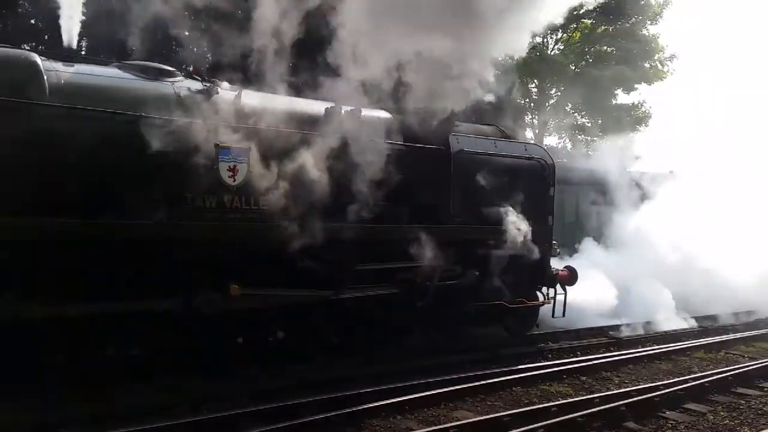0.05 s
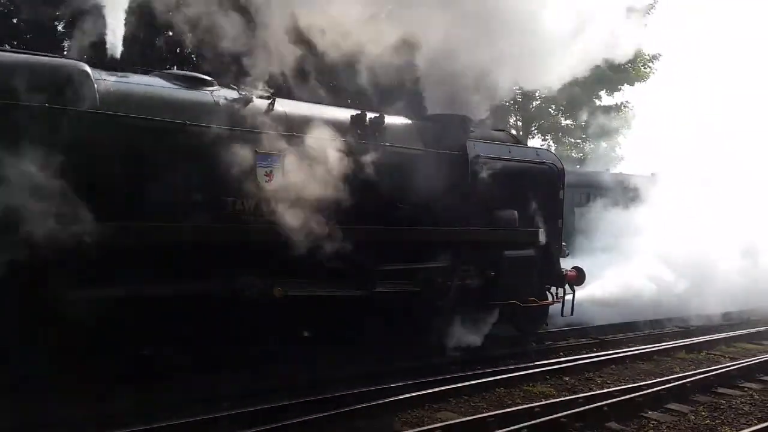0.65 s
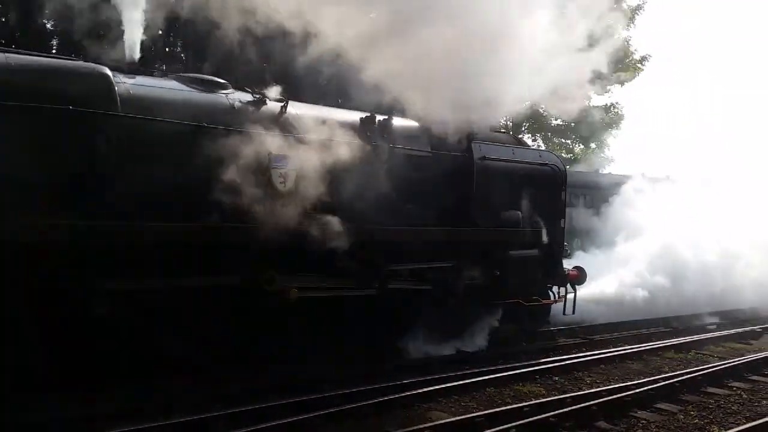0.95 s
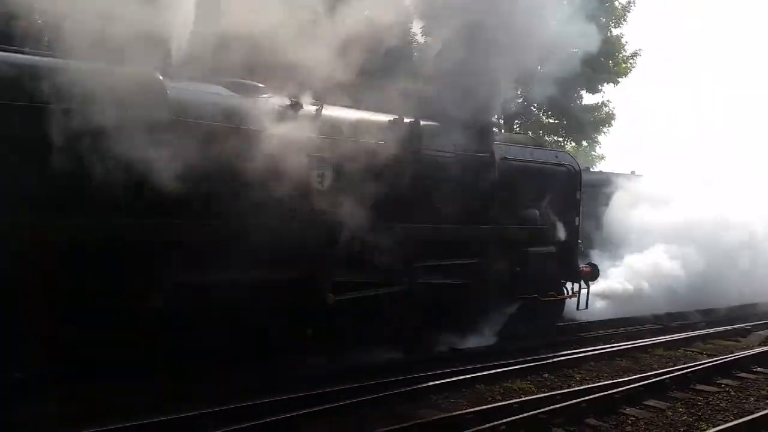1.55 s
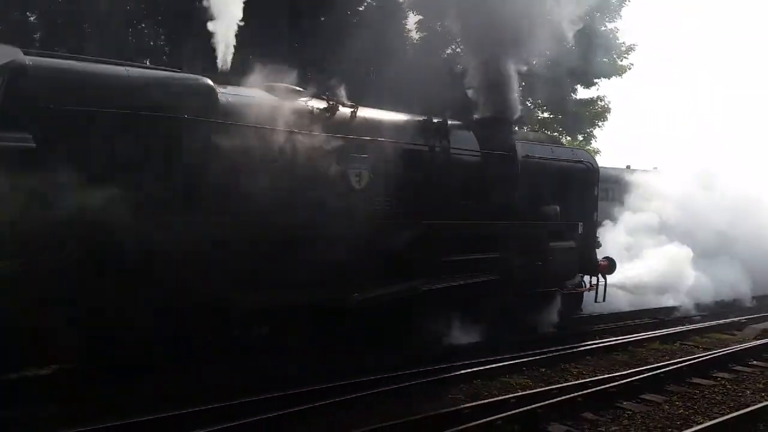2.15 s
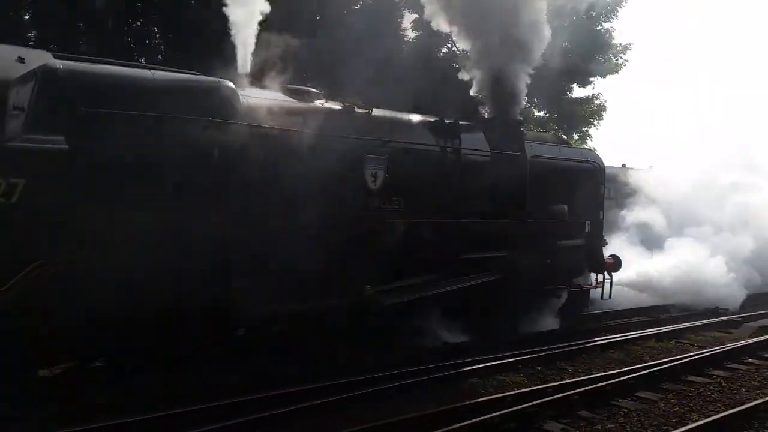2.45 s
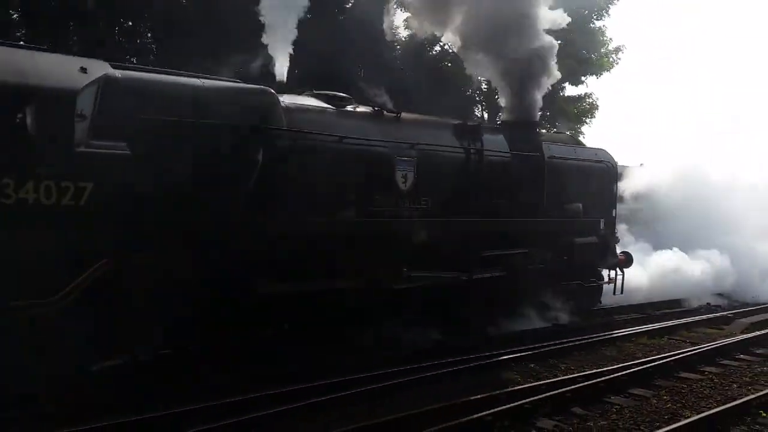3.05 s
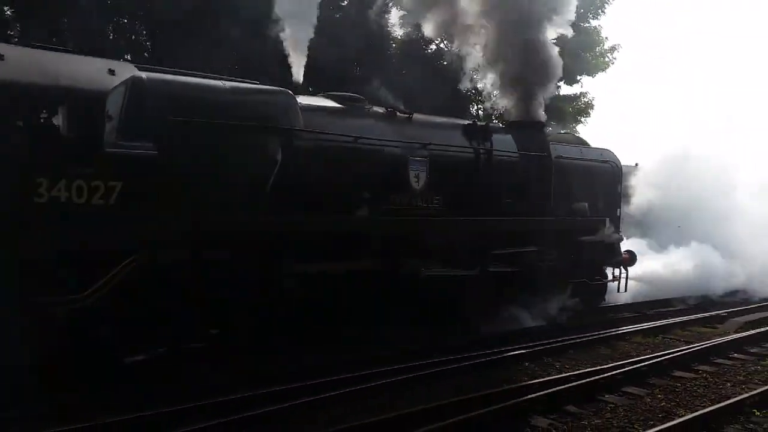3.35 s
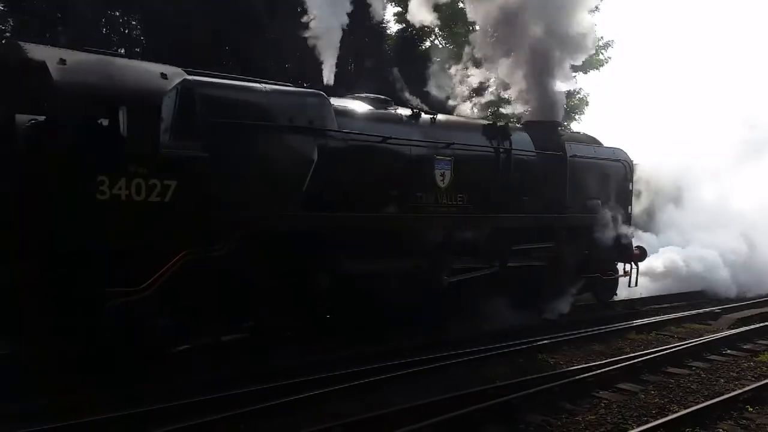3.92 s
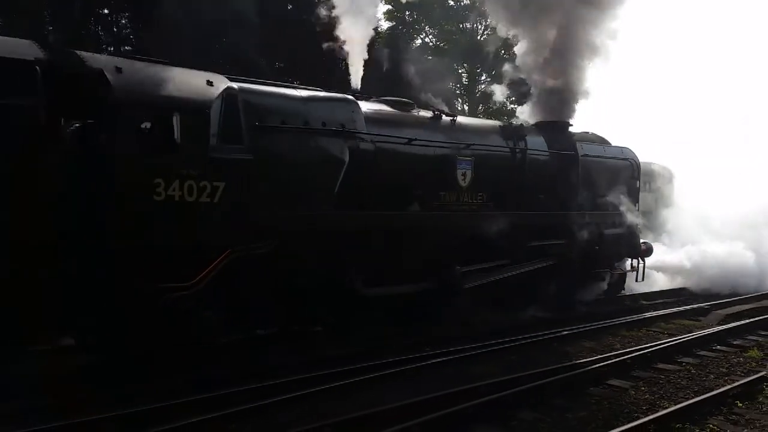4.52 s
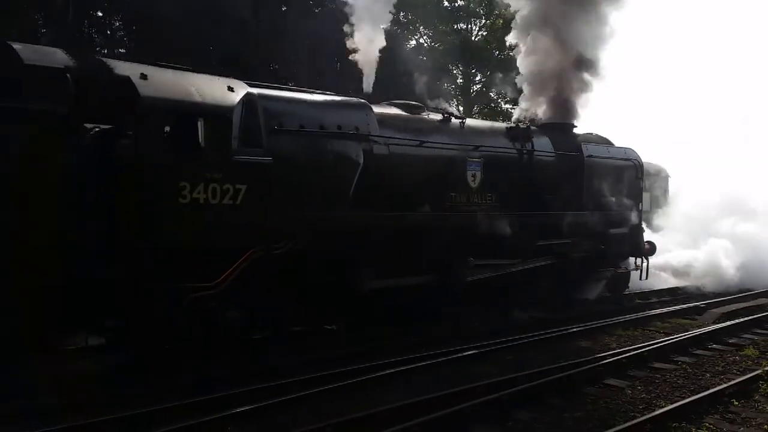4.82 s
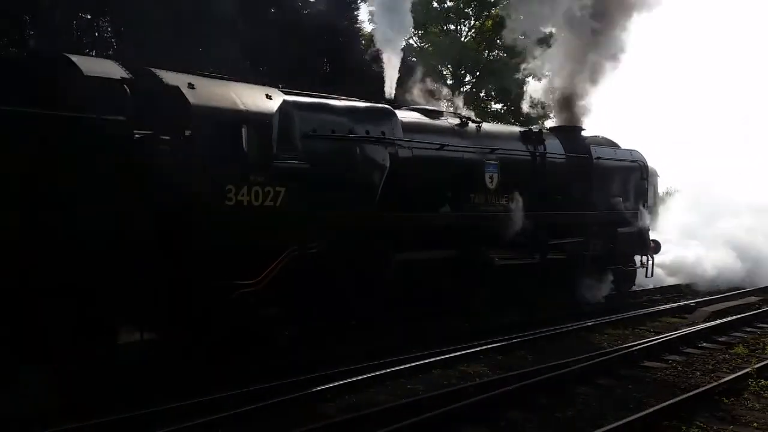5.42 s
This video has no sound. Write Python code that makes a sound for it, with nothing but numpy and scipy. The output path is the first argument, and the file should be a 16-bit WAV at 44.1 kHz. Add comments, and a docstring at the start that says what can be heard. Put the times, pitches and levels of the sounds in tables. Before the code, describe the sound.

Loud, bright steam hiss from a creeping locomotive, with slow breathy chimney puffs and gusts of wind rumbling on the microphone.

```python
"""A steam locomotive creeps along a station, blowing off. From the start, drain cocks and safety valve hiss
loudly from the left while wind buffets the two ports of a hand-held microphone, each hearing the steam
in its own colour. The chimney puffs about once a second. From 0.6 to 1.7 s three eddies thump the right
port; from about 1.3 s the jets whistle faintly. The hiss drifts towards the middle, and by 5 s the cocks
have faded as the front end moves away, leaving the valve on top."""
import sys
import numpy as np
from scipy import signal
from scipy.fft import rfft, irfft, next_fast_len
from scipy.io import wavfile
from scipy.ndimage import uniform_filter1d, map_coordinates

SR = 44100
rng = np.random.default_rng(int(sys.argv[2]) if len(sys.argv) > 2 else 0)


def wrap_up_sound(samples):
    """Save the sound to the file named by the first command line argument, as 16-bit audio."""
    columns = np.atleast_2d(samples).T
    # keep every value between -1 and 1, then stretch to whole-number steps
    tamed = np.clip(columns, -1, 1)
    steps = np.round(tamed * 32767).astype(np.int16)
    wavfile.write(sys.argv[1], SR, steps)


N = 250488
TIME_S = np.arange(N) / SR

# piston strokes: t/s, full flow/s, puff/dB, bark/dB, bark tilt/(dB/octave), lull depth/dB, lull build/s
PISTON_STROKES = [(-.75, .5, -22.8, -60, 0, 0, .03), (.215, .85, -20.8, -22.5, 1, 1.6, .1),
                  (1.17, .18, -20.3, -45, 0, .7, .03), (2.135, .32, -21.5, -34, 0, 5, .031),
                  (3.243, .3, -21.6, -18.8, -2, 2, .05), (4.21, .33, -22.7, -45, 0, 2, .035),
                  (5.155, .15, -22.8, -24.5, 1.5, 3.4, .13)]
# likeness of the steam at the two ports: f/Hz, coherence/(0-1)
PORT_COHERENCE = [(200, .4), (800, .4), (1800, .1), (3100, .25), (5500, .1), (7200, .3), (8600, .65),
                  (9700, .42), (11500, .28), (12300, .3), (13300, .62)]
# lead of the left port: t/s, hiss lead/ms, sizzle lead/ms
LEFT_LEAD_MS = [(0, .225, .148), (.45, .222, .145), (.85, .208, .118), (1.4, .183, .085), (1.95, .176, .07),
                (2.35, .165, .04), (3.05, .152, .027), (3.3, .132, .004), (3.62, .128, .002),
                (3.8, .113, -.016), (4.7, .095, -.05), (5.3, .082, -.072), (5.68, .075, -.078)]
# drain cocks, receding: t/s, level/dB
COCKS_DB = [(0, -12), (.4, -14.5), (1.3, -13), (1.7, -16.5), (1.97, -14), (2.03, -17), (2.4, -16),
            (3.1, -17.5), (3.35, -18.5), (4.5, -20.5), (4.95, -28), (5.68, -30)]
# ground echo while the front end is near: t/s, gain/1
GROUND_GAIN = [(0, .3), (.5, .25), (1.2, 0.038), (1.8, 0)]
# safety valve, nearing: t/s, level/dB
VALVE_DB = [(0, -16), (.8, -16.5), (1.3, -14.5), (2.4, -14), (3.5, -13.5), (4.65, -13.5), (4.9, -14),
            (5.3, -14), (5.68, -13)]
# topmost sizzle: t/s, left/dB, right/dB
SIZZLE_DB = [(0, -20, -13), (.3, -13, -14), (.55, -19, -19), (.85, -13, -15), (1.3, -14, -17),
             (1.7, -13, -19), (2.1, -20.5, -22), (2.3, -19, -21), (2.75, -21, -24), (3.1, -26, -22),
             (3.9, -24, -18), (4.2, -24, -15), (5.3, -26, -17.5), (5.68, -34, -19)]
# breeze: t/s, left/dB, right/dB
BREEZE_DB = [(0, -30.5, -25), (1.25, -32.5, -24), (1.34, -30.5, -26), (1.8, -32, -32.5), (2.08, -33, -38),
             (2.5, -28.5, -35), (3.5, -32, -37), (4.7, -31.5, -38.5), (4.92, -41.5, -40),
             (5.06, -39.5, -36), (5.17, -33.5, -48), (5.68, -33.5, -54)]
# relative spectra at the ports: f/Hz, left/dB, right/dB
COCKS_SPECTRUM_DB = [(100.0, -43, -50.0), (302, -10.5, -28), (1930, -8, -6.5), (4000.0, -13, -4.5),
                     (5330, -14, -1.5), (7000.0, -11, -31), (8340, -7, -6), (8900, 0, 2.5),
                     (9300, 1.5, -6.5), (9900, 3.5, -1), (11200, 5, 3.5), (11740, 4.5, .5),
                     (13000, 3.5, -5), (15200, -2.5, -10)]
VALVE_SPECTRUM_DB = [(250.0, -54, -34), (670, -18, -15.5), (1380, -22.5, -18), (2450, -9, -10),
                     (3100, -30, -4), (4570, -18, 1.5), (5360, -33, 0.5), (6160, -16, 5), (7200, -17, 5),
                     (7800, -4, 3), (9160, 2.5, 2.5), (10100, 0.2, -5), (11140, 3.5, -7.5),
                     (11800, 1.5, -5), (12900, -2, -0.5), (14500, -6, -7.5)]
SIZZLE_SPECTRUM_DB = [(7000, -60, -70), (9500, -24, -30), (11900, -11, -11), (12600, -.5, -.5),
                      (13500, 0, .5), (14500, -1, -1.5)]
WIND_SPECTRUM_DB = [(15, -27, -28), (40, -12, -14), (80, -2, -4.5), (130, 0, -1), (230, -5, -1.5),
                    (400, -11.5, -4), (800, -26, -8.5), (1600, -33, -11), (3200, -45, -19),
                    (8000, -70, -45), (14000, -90, -70)]
EXHAUST_SPECTRUM_DB = [(40.0, -18, -45.0), (100.0, 4.5, -26), (240, -21, -7), (440, -1.5, -6),
                       (634, -3.5, -3.5), (875, -5, -2), (1870, -1.5, -3.5), (2350, 3.5, 0), (3290, 0.5, 4),
                       (4140, -2, -5), (5360, -19, 1.5), (8000.0, -13, -25), (14000.0, -24, -30)]
# gusts: t/s, length/s, level/dB, brightness/dB, port hit (L or R)
WIND_GUSTS = [(0.019, 0.077, -18, 3, "R"), (0.184, 0.2, -18.5, 2.5, "R"), (0.463, .087, -19.5, 0.5, "R"),
              (0.67, 0.26, -18, 2, "R"), (0.698, 0.045, -24, 3, "L"), (0.985, .14, -16, -0.5, "R"),
              (0.988, .035, -25, -1, "L"), (1.135, 0.16, -18, 0, "R"), (1.23, .05, -32, 2, "L"),
              (1.341, 0.039, -18, -3, "R"), (1.399, 0.03, -16.5, -1.5, "R"), (1.556, 0.32, -25.5, -4, "L"),
              (1.669, 0.04, -16, -4, "R"), (1.903, 0.056, -28, 7, "R"), (2.135, 0.11, -25.5, -1, "L"),
              (2.25, 0.12, -24, 1, "R"), (2.4, 0.058, -23.5, -2, "L"), (2.516, 0.15, -25.5, 3.5, "R"),
              (2.546, 0.031, -24, 4, "L"), (2.808, .08, -24.5, 2, "L"), (3.02, 0.1, -32, 8.5, "R"),
              (3.24, 0.06, -26, -2, "L"), (3.392, 0.1, -24, 0, "L"), (3.533, 0.045, -22.5, 0, "R"),
              (3.817, 0.064, -23, -11, "L"), (3.927, 0.035, -20.5, -0.5, "R"), (3.94, 0.087, -24, -2, "L"),
              (4.03, 0.06, -21, 1, "L"), (4.252, 0.087, -23, 4, "L"), (5.113, 0.068, -27.5, -17, "L"),
              (5.41, 0.19, -26, 1, "L")]
# chimney resonances: f/Hz, width/Hz, level/dB
CHIMNEY_MODES = [(750, 190, 8), (1100, 150, 5.5), (1840, 150, -10)]
# single eddies: t/s, peak/dB, f/Hz
EDDY_THUMPS = [(0.632, -13, 220), (1.544, -5, 200), (1.681, -13, 170)]
# jet resonances: start/s, end/s, f/Hz, width/Hz, left/dB, right/dB
WHISTLE_BANDS = [(1.3, 5.2, 6150, 260, -53, -32), (2.17, 2.55, 2950, 500, -36, -31),
                 (3.3, 4.5, 8850, 380, -31, -32), (4.8, 5.7, 6920, 200, -46, -30)]

COCKS_FOLLOW, VALVE_FOLLOW, SIZZLE_FOLLOW = 0.29, 0.28, 0.28  # dB per dB of exhaust flow


def amp(db):
    """Decibels to gain."""
    return 10 ** (np.asarray(db) / 20)


def unit(x):
    """Scale to rms 1."""
    return x / np.sqrt(np.mean(x ** 2) + 1e-20)


def along(table, hz):
    """Table columns at hz, on a log frequency axis."""
    knots_hz, *cols = np.transpose(table)
    return np.array([np.interp(np.log(hz + 1), np.log(knots_hz + 1), col) for col in cols])


def curves(table):
    """Table columns at every sample."""
    knots_s, *cols = np.transpose(table)
    return np.array([np.interp(TIME_S, knots_s, col) for col in cols])


def wobble(rate_hz):
    """Smooth random curve, rate_hz knots a second."""
    return map_coordinates(rng.standard_normal(int(N * rate_hz / SR) + 4), [TIME_S * rate_hz])


def filtered(x, response):
    """Apply a frequency response."""
    size = next_fast_len(N + SR // 4)
    return irfft(rfft(x, size) * response(np.fft.rfftfreq(size, 1 / SR)), size)[..., :N]


def delayed(x, ms):
    """Fractional delay; may drift."""
    return map_coordinates(x, [np.arange(N) - ms * SR / 1000], order=5, mode="mirror")


def stroke_gain(start_s, hold_s, open_s=0.011, sag_db_per_s=5.5):
    """One stroke: fast opening, full flow, a sag once the cylinder is spent."""
    age_s = np.maximum(TIME_S - start_s, 0)
    return (1 - np.exp(-age_s / open_s)) * amp(-sag_db_per_s * np.maximum(age_s - hold_s, 0))


def lulls_db(lead_s=0.082, recover_s=0.033):
    """The flow is pinched briefly before each stroke."""
    level_db = np.zeros(N)
    for start_s, *_, depth_db, build_s in PISTON_STROKES:
        age_s = TIME_S - start_s + lead_s
        level_db -= depth_db * np.exp(-(age_s / np.where(age_s < 0, build_s, recover_s)) ** 2)
    return level_db


def flow_db():
    """Exhaust flow of all strokes, relative to full flow."""
    gains = [stroke_gain(start_s, hold_s) for start_s, hold_s, *_ in PISTON_STROKES]
    return lulls_db() + 20 * np.log10(np.max(gains, axis=0))


def turbulence(streak_db):
    """Two independent noises in which narrow streaks swell and fade."""
    bins = signal.stft(rng.standard_normal((2, N)), nperseg=2048)[2]
    streaks = uniform_filter1d(rng.standard_normal(bins.shape), size=3, axis=1)
    streaks = uniform_filter1d(streaks, size=20, axis=2)
    return signal.istft(bins * amp(streak_db * unit(streaks)))[1][:, :N]


def jet(spectrum_db, lead_ms, streak_db):
    """Turbulent steam, rms 1; the ports share part of it, the left leading by lead_ms."""
    coherence = lambda hz: np.clip(along(PORT_COHERENCE, hz)[0], 0, .95)
    left, other = turbulence(streak_db)
    shared = filtered(delayed(left, lead_ms), coherence)
    right = shared + filtered(other, lambda hz: np.sqrt(1 - coherence(hz) ** 2))
    return unit(filtered(np.array([left, right]), lambda hz: amp(along(spectrum_db, hz))))


def drain_cocks(echo_ms=1.265, sputter_db=0.89):
    """Wet steam spurts from the cylinders with each stroke: bright sputtering hiss, ground echo."""
    level_db = curves(COCKS_DB) + COCKS_FOLLOW * flow_db() + sputter_db * wobble(70)
    hiss = amp(level_db) * jet(COCKS_SPECTRUM_DB, curves(LEFT_LEAD_MS)[0], streak_db=2.3)
    return hiss + curves(GROUND_GAIN) * np.array([delayed(port, echo_ms) for port in hiss])


def safety_valve(flutter_db=0.73, swirl_db=2.5):
    """A steady jet swells with the strokes and flutters in moving air; its sizzle swirls at each port."""
    hiss_lead_ms, sizzle_lead_ms = curves(LEFT_LEAD_MS)
    hiss_db = curves(VALVE_DB) + VALVE_FOLLOW * flow_db() + flutter_db * wobble(22)
    hiss = amp(hiss_db) * jet(VALVE_SPECTRUM_DB, hiss_lead_ms, streak_db=2.0)
    swirl = np.array([wobble(9), wobble(9)])
    sizzle_db = curves(SIZZLE_DB) + SIZZLE_FOLLOW * flow_db() + swirl_db * swirl
    return hiss + amp(sizzle_db) * jet(SIZZLE_SPECTRUM_DB, sizzle_lead_ms, streak_db=1.8)


def hollow(steam, spacing_hz=460, wander=0.11, depth=.47, top_hz=1250):
    """Hollow low mids: evenly spaced notches that slowly wander."""
    delay_ms = 1000 / (spacing_hz * (1 + wander * wobble(5)))
    low = filtered(steam, lambda hz: 1 / (1 + (hz / top_hz) ** 4))
    return steam - depth * np.array([delayed(port, delay_ms) for port in low])


def wind(lump_db=0.92, swing_db=2.4, roar_hz=290, rise_s=0.0089, fall_s=0.028):
    """Air buffets each port on its own: uneven breeze, gusts on top, quick lumps within."""
    rumble = filtered(rng.standard_normal((2, N)), lambda hz: amp(along(WIND_SPECTRUM_DB, hz)))
    lumpy = np.array([unit(port * amp(lump_db * wobble(60))) for port in rumble])
    roar = filtered(lumpy, lambda hz: hz ** 4 / (hz ** 4 + roar_hz ** 4))
    breeze = amp(curves(BREEZE_DB) + swing_db * np.array([wobble(14), wobble(14)]))
    low_gain, roar_gain = breeze.copy(), breeze.copy()
    for start_s, length_s, level_db, bright_db, port in WIND_GUSTS:
        age_s = TIME_S - start_s
        gust = np.clip(np.minimum(age_s / rise_s, (length_s - age_s) / fall_s) + .5, 0, 1)
        side = "LR".index(port)
        low_gain[side] = np.maximum(low_gain[side], amp(level_db) * gust)
        roar_gain[side] = np.maximum(roar_gain[side], amp(level_db + bright_db) * gust)
    return low_gain * (lumpy - roar) + roar_gain * roar


def chimney_ring(tilt_db_per_octave):
    """Noise ringing the chimney's resonances, rms 1."""
    def response(hz):
        modes = sum(amp(db) * 1j * hz * width_hz / (mode_hz ** 2 - hz ** 2 + 1j * hz * width_hz)
                    for mode_hz, width_hz, db in CHIMNEY_MODES)
        octaves = np.log2(np.clip(hz, CHIMNEY_MODES[0][0], CHIMNEY_MODES[-1][0]))
        return modes * amp(tilt_db_per_octave * octaves)
    return unit(filtered(rng.standard_normal(N), response))


def exhaust(bark_attack_s=0.01, bark_t60_s=0.29, bark_pan_db=1.5, flutter_db=0.98):
    """One breathy puff per stroke; some puffs open with a short ringing bark from the chimney."""
    puff_gain, barks = np.zeros(N), np.zeros(N)
    for start_s, hold_s, puff_db, bark_db, tilt_db_per_octave, *_ in PISTON_STROKES:
        age_s = np.maximum(TIME_S - start_s, 0)
        puff_gain = np.maximum(puff_gain, amp(puff_db) * stroke_gain(start_s, hold_s))
        bark_gain = amp(bark_db - 60 * age_s / bark_t60_s) * (1 - np.exp(-age_s / bark_attack_s))
        barks += bark_gain * chimney_ring(tilt_db_per_octave)
    puff_gain *= amp(lulls_db() + flutter_db * wobble(25))
    puffs = puff_gain * jet(EXHAUST_SPECTRUM_DB, lead_ms=0.054, streak_db=2.0)
    return puffs + barks * amp([[bark_pan_db], [-bark_pan_db]])


def thumps():
    """Eddies cross the right port: each a quick suck of air between two soft pushes."""
    out = np.zeros((2, N))
    for centre_s, peak_db, hz in EDDY_THUMPS:
        phase_squared = (np.pi * hz * (TIME_S - centre_s)) ** 2
        out[1] += amp(peak_db) * (2 * phase_squared - 1) * np.exp(-phase_squared)
    return out


def whistles(fade_s=0.22):
    """Narrow jet resonances swell out of the hiss and sink back."""
    out, lead_ms = np.zeros((2, N)), curves(LEFT_LEAD_MS)[0]
    for start_s, end_s, centre_hz, width_hz, left_db, right_db in WHISTLE_BANDS:
        resonance = lambda hz: 1 / (1 + ((hz - centre_hz) / (width_hz / 2)) ** 2)
        band = unit(filtered(rng.standard_normal(N), resonance))
        swell = np.clip(np.minimum(TIME_S - start_s, end_s - TIME_S) / fade_s + .5, 0, 1)
        out += swell * np.array([amp(left_db) * band, amp(right_db) * delayed(band, lead_ms)])
    return out * amp(VALVE_FOLLOW * flow_db())


def scene():
    """Engine steam plus wind at the ports."""
    steam = drain_cocks() + safety_valve() + whistles() + exhaust()
    return hollow(steam) + wind() + thumps()


def record(dry, top_hz=14600):
    """Hard band limit."""
    return filtered(dry, lambda hz: hz < top_hz)


dry = scene()
out = record(dry)
wrap_up_sound(out)
```